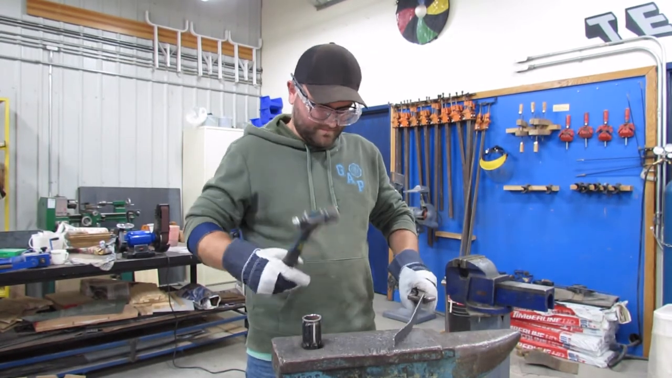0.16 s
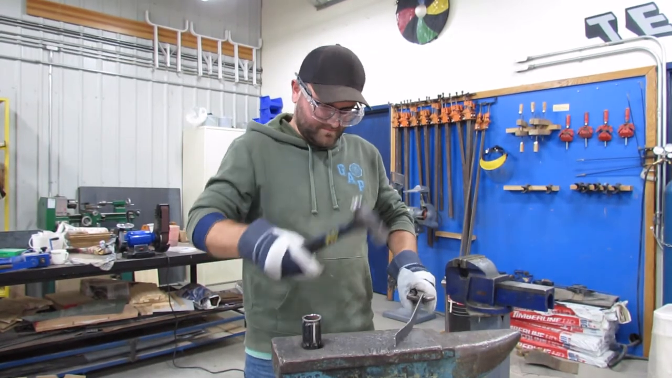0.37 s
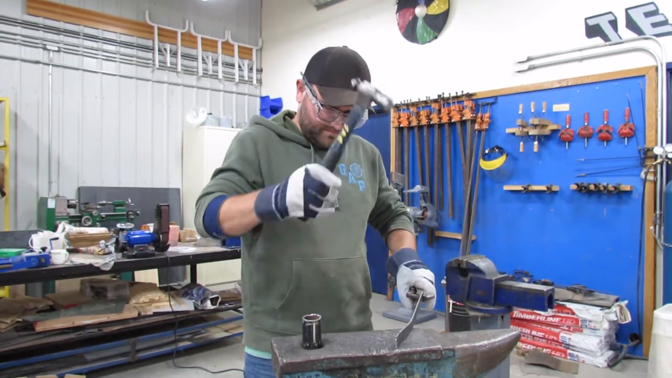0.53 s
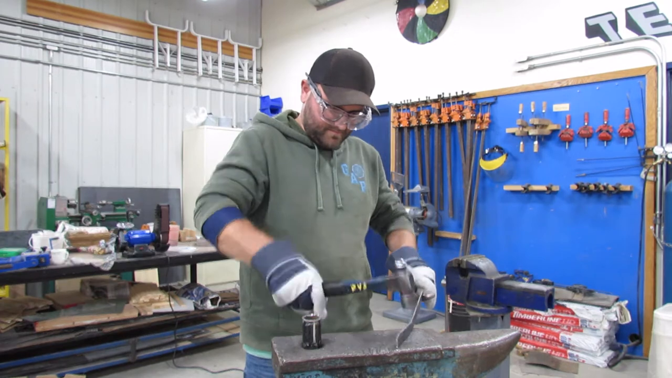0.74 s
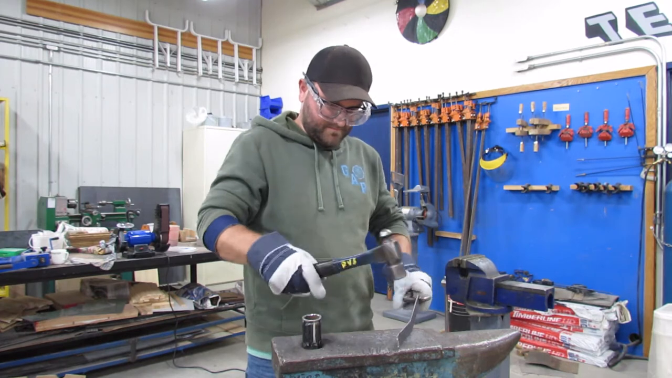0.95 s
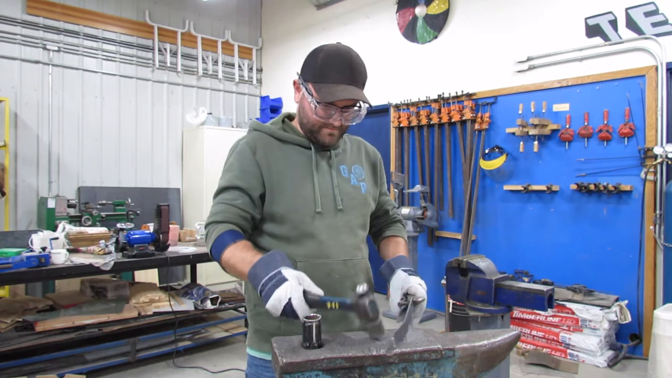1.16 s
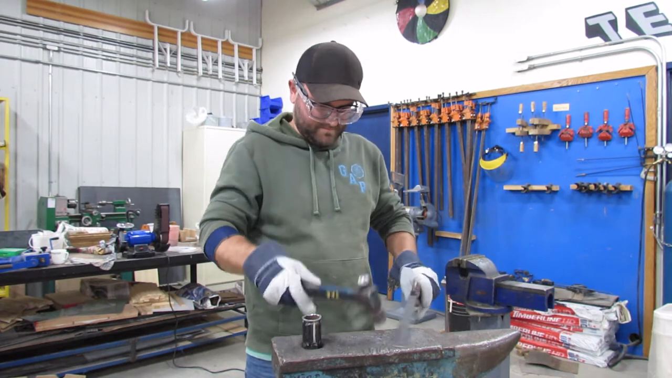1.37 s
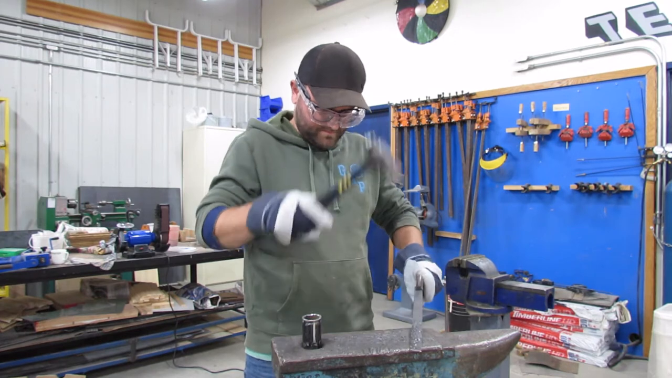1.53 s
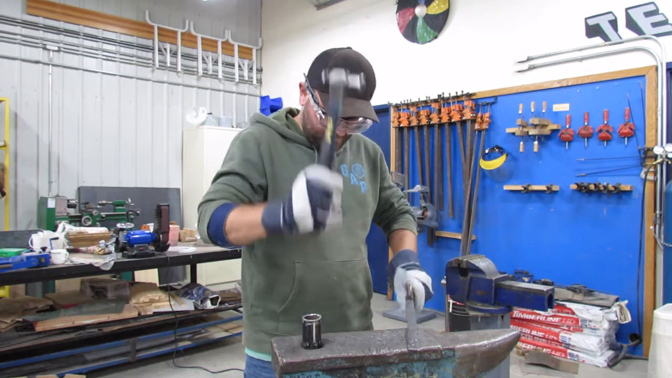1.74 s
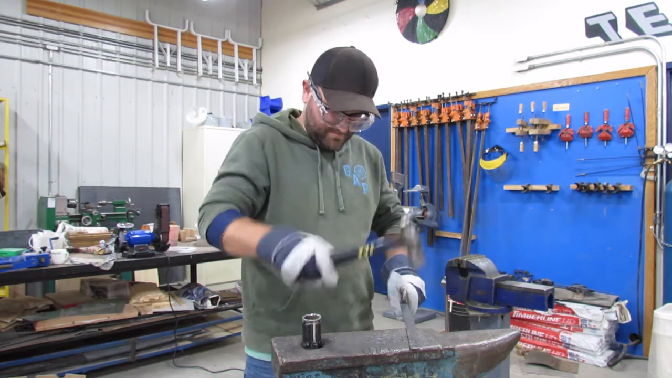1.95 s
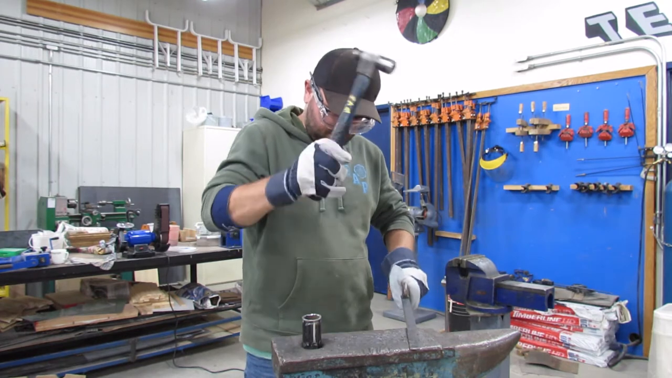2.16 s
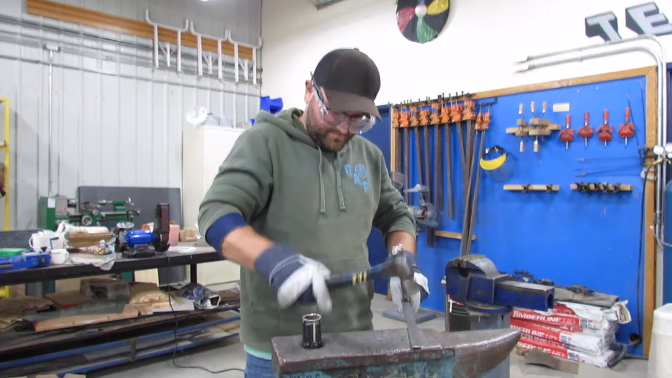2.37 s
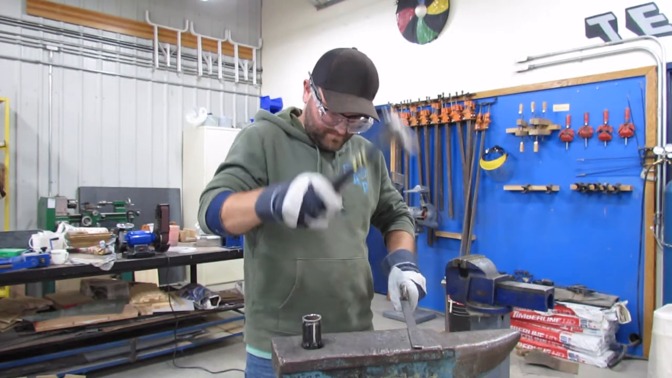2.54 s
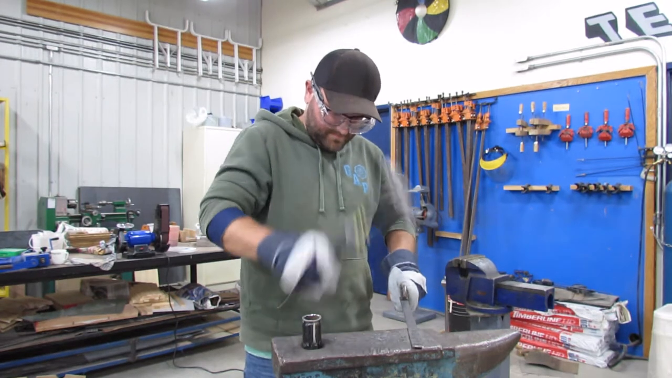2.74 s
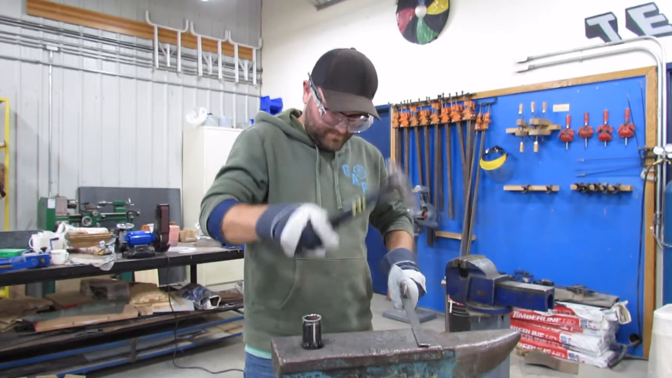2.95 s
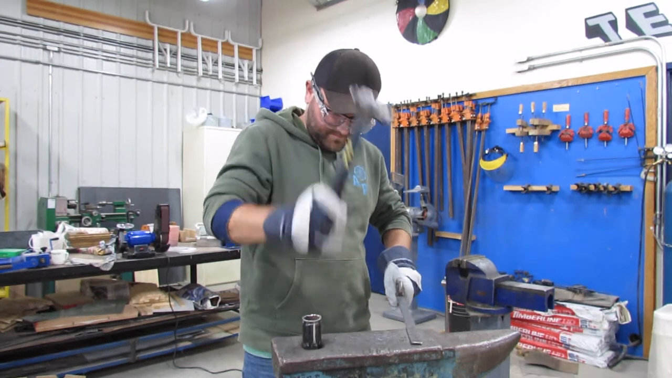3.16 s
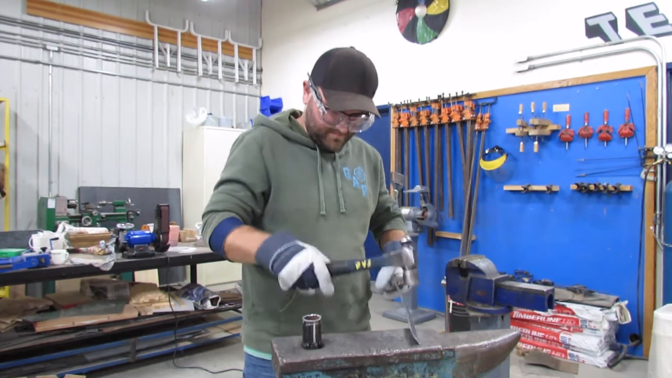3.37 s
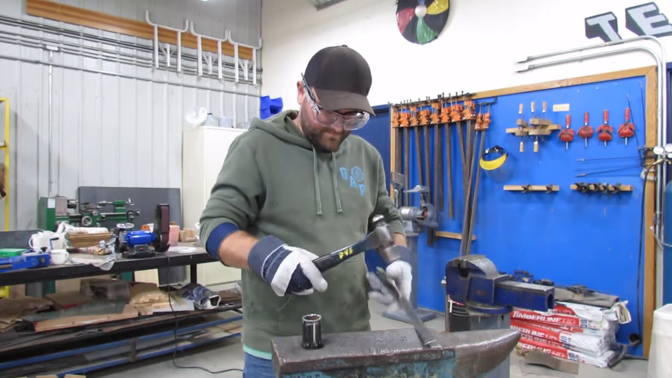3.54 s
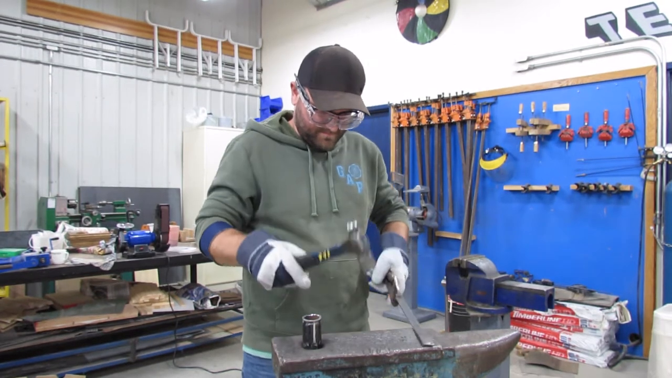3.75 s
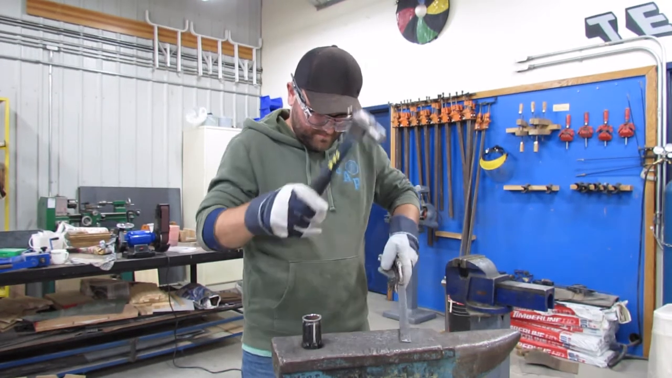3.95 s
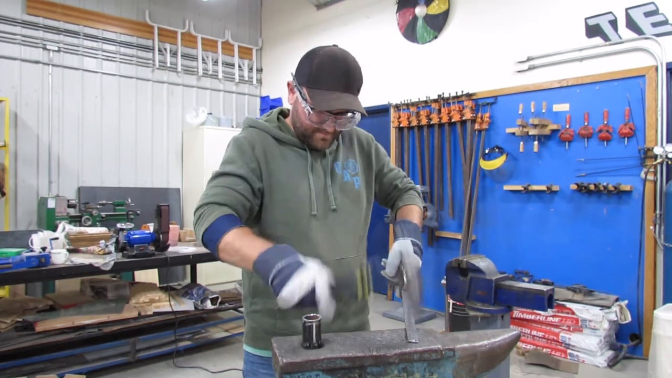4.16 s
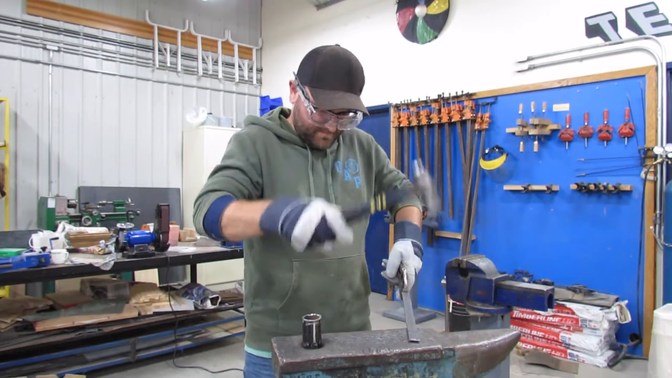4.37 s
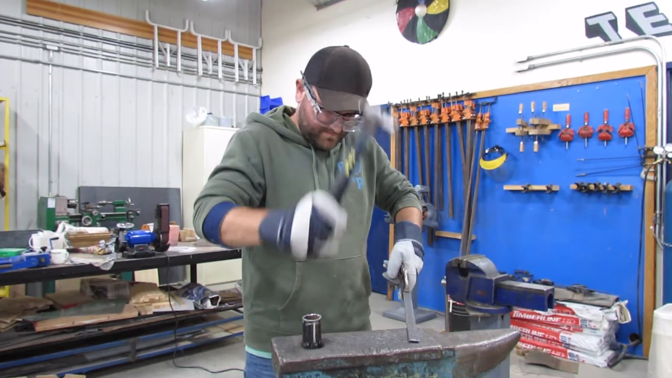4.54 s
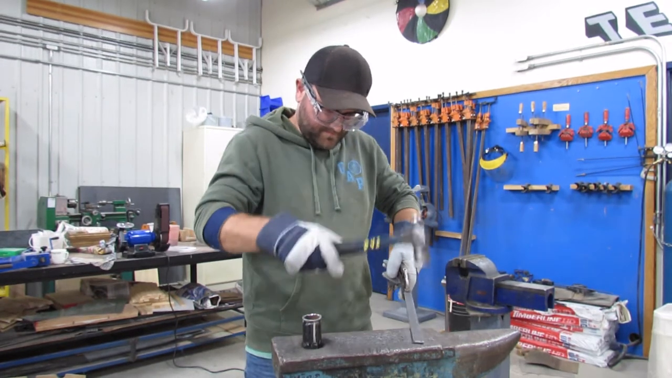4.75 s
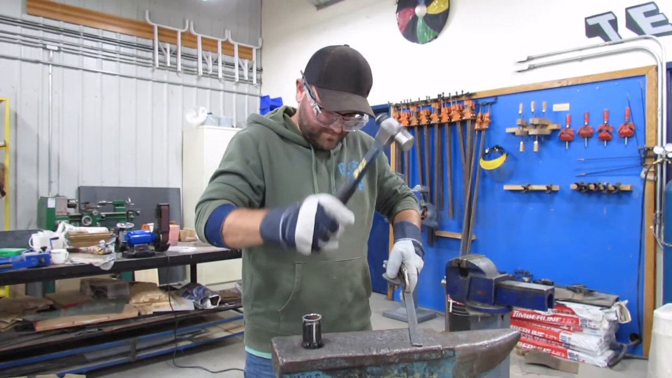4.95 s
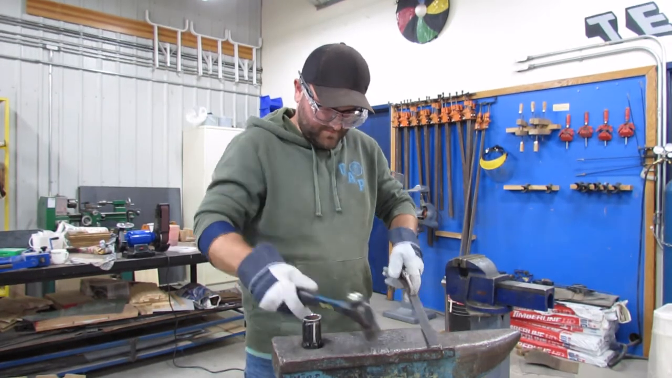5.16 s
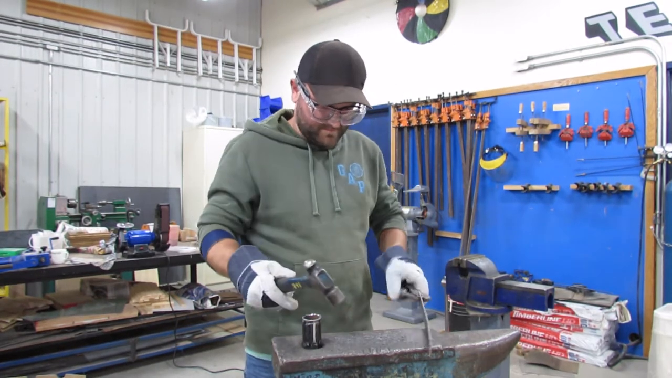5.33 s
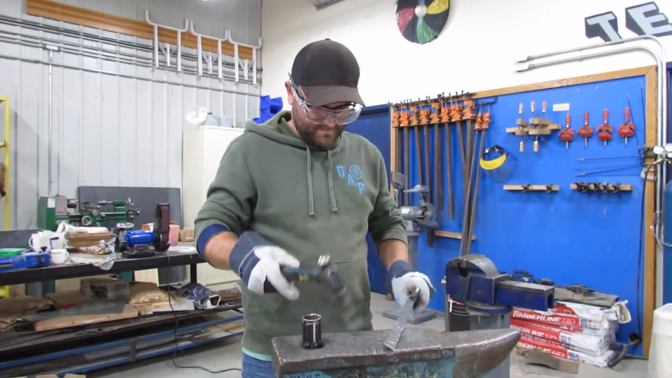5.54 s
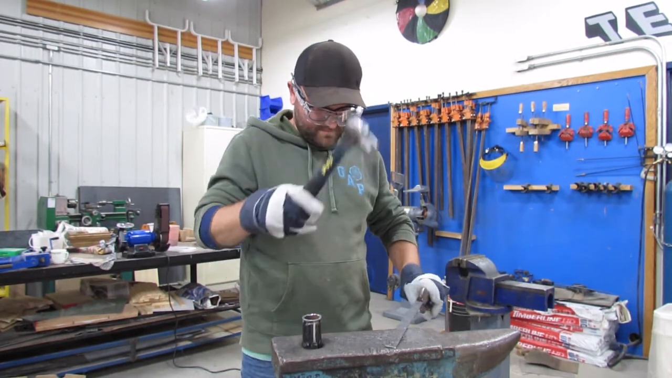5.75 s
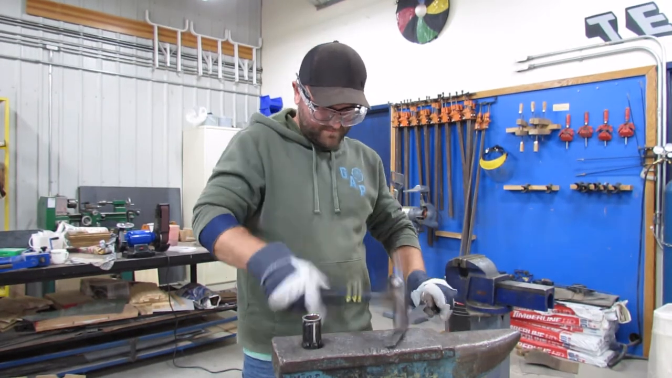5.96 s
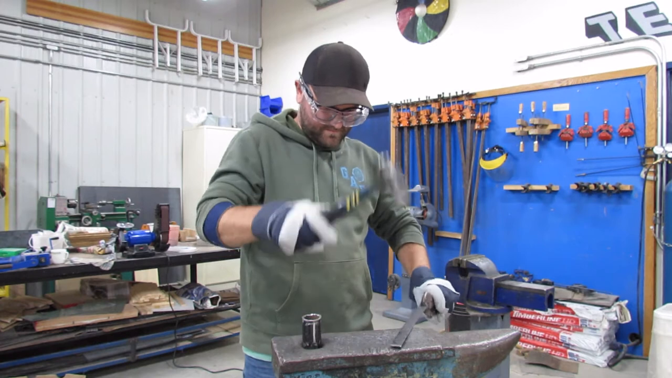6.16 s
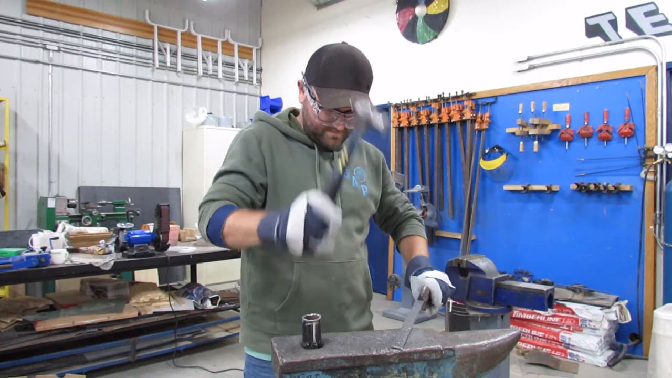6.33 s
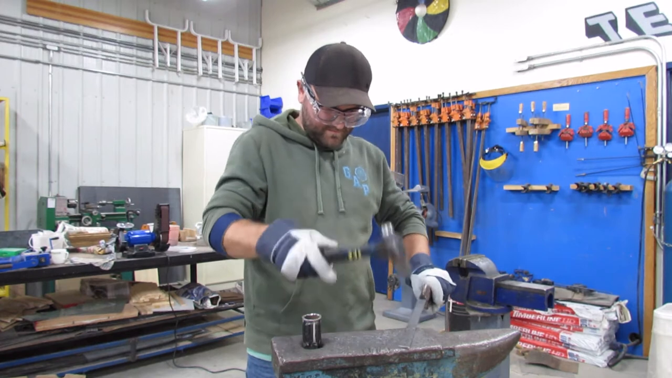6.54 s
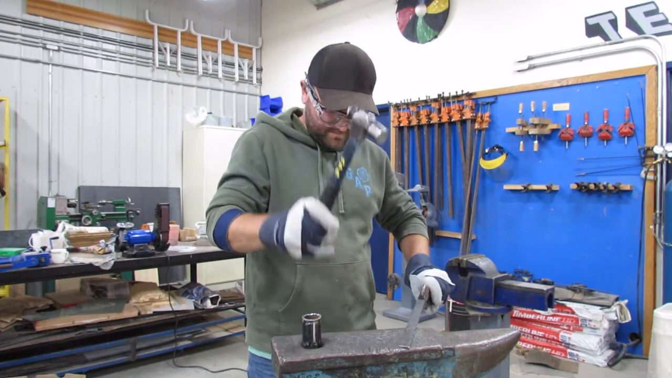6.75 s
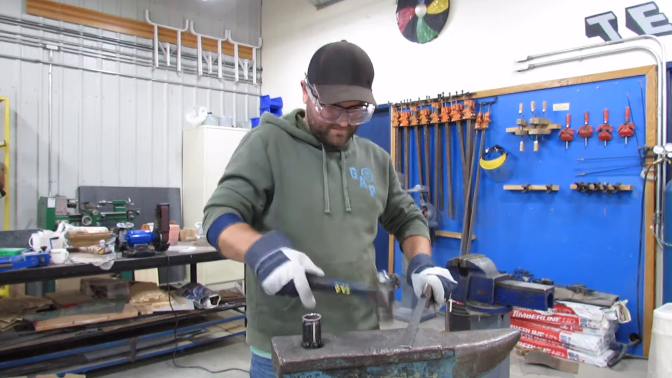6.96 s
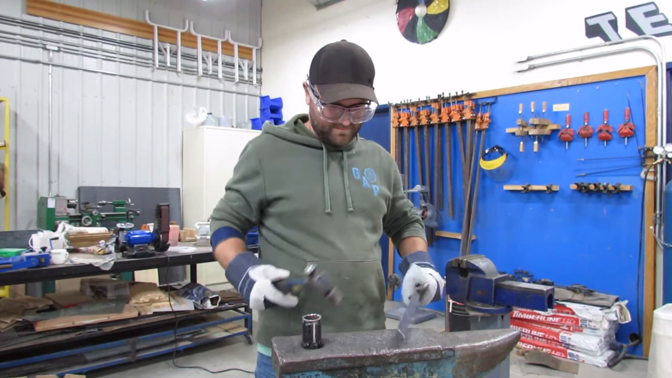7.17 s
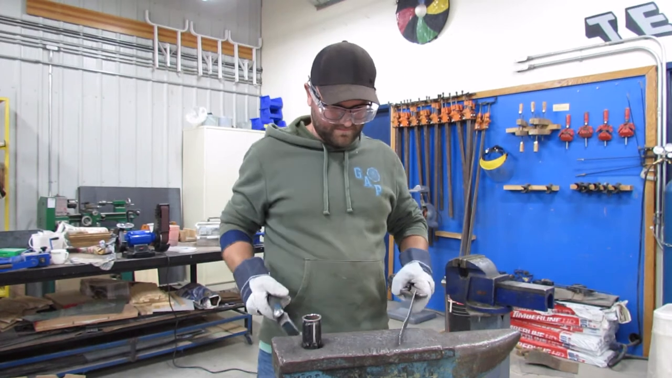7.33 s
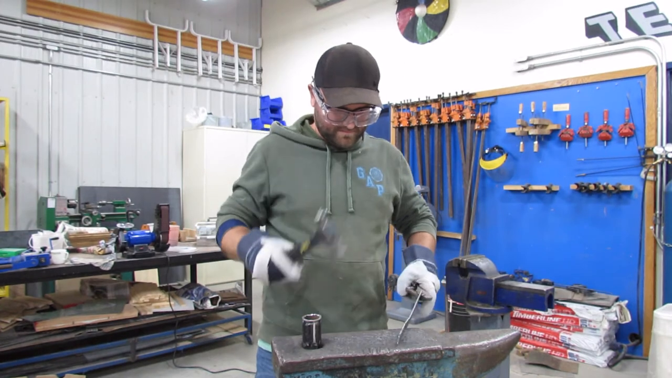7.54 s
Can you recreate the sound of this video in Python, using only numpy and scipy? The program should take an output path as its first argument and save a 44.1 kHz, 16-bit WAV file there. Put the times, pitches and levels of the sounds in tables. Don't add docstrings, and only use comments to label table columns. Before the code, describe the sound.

A ball peen hammer strikes a steel flat bar on an anvil in loud, sharp, short-ringing blows inside a large metal-walled workshop, with brief pauses.

```python
import sys
import numpy as np
from scipy import signal
from scipy.fft import rfft, irfft, next_fast_len
from scipy.io import wavfile
from scipy.ndimage import uniform_filter1d, map_coordinates

SR = 44100
rng = np.random.default_rng(int(sys.argv[2]) if len(sys.argv) > 2 else 0)


def voltage_ratio(decibels):
    exponent = np.asarray(decibels, float) / 20
    return 10 ** exponent


def materialize(psi):
    bounded = np.clip(np.atleast_2d(psi).T, -1, 1)
    quanta = np.round(bounded * 32767).astype(np.int16)
    wavfile.write(sys.argv[1], SR, quanta)


N = 339570

# (edge_db, chatter_t60_s)
HARD, LIGHT = (-3.5, 0.01), (-15, 0.026)
BLOW_TAIL_S, LIGHT_TAIL_S = 0.75, 0.4
TAP_CRACK_DB = -2.5
LOOSE_DAMPING = 0.65
MIDDLE_HZ = 5515


def hammer_blows():
    # start_s, peak_db, anvil_ring_db, bar_ring_db, brightness_db_per_octave
    blow_table = [(0.799, -4.5, 7.5, -14.5, 0), (1.9319, -.5, 5, -13.5, 3), (2.3981, 0.25, 5.5, -14, 4),
                  (2.851, 1.44, 3.9, -20, 2.7), (3.3169, 0.4, 5, -5.5, 2.1), (4.2516, -1.5, 4, -0.5, 3.5),
                  (4.696, 0.7, 4.5, -0.5, 2.85), (5.1419, -3, 9, -15, 2.5), (6.0367, -0.05, 5.5, -15.5, 4),
                  (6.4935, 1.2, 2.7, -8, 3), (6.922, -1.5, 7.5, -8, 1.5)]
    rows = [(*row, 6 - row[1], MIDDLE_HZ) for row in blow_table]
    return contacts(rows, HARD, BLOW_TAIL_S, crack_db=4.0, wet_db=-8.5, favour_db=1.5, damping=0.52)


def hammer_rests():
    # start_s, peak_db, anvil_ring_db, bar_ring_db, brightness_db_per_octave
    rest_table = [
        (1.248, -30, 0.45, -13, -8.5),
        (7.008, -22.5, 13.4, 7.5, -2),
    ]
    rows = [(*row, -9.5 - row[1], MIDDLE_HZ) for row in rest_table]
    return contacts(rows, HARD, LIGHT_TAIL_S, TAP_CRACK_DB, wet_db=-4.5, favour_db=5, damping=LOOSE_DAMPING)


def bar_taps():
    # start_s, peak_db, bar_ring_db, brightness_db_per_octave, favoured_mode_hz
    tap_table = [(1.277, -33.5, -0.2, -4, 4550), (1.337, -38, 10, -1.2, 4550),
                 (1.386, -26, -2.5, 5.5, 5000), (1.455, -35, 3, 3.7, 7990), (1.472, -36, 5, 2.6, 5515),
                 (3.615, -43, 7.5, -2, 5515), (3.652, -36, 1.1, 2, 7990), (3.668, -40, 4.5, 8.5, 7990),
                 (3.68, -35.5, -7, 2.5, 6660), (3.853, -39, 5, 3, 5000), (3.886, -45, 4, 1.5, 5515),
                 (3.925, -47.5, 0, 0.5, 6660), (3.983, -54, 5.5, -2, 5515), (4.06, -57.5, 7, 3.5, 5515),
                 (5.577, -45.5, 16, -4, 2720), (5.599, -42, 10, 0.5, 5000), (7.367, -27.5, -4, 0.6, 2720)]
    anvil_db, thud_db = -27, 1
    rows = [(s, db, anvil_db, bar_db, tilt_db, thud_db, hz) for s, db, bar_db, tilt_db, hz in tap_table]
    return contacts(rows, LIGHT, LIGHT_TAIL_S, TAP_CRACK_DB, wet_db=-3.5, favour_db=5, damping=LOOSE_DAMPING)


def contacts(rows, touch, tail_s, crack_db, wet_db, favour_db, damping):
    out = np.zeros((2, N))
    t = np.arange(SR // 4) / SR
    for s, db, anvil_db, bar_db, tilt_db, thud_db, favoured_hz in rows:
        steel = voltage_ratio(anvil_db - 17.5) * anvil_ring(tilt_db, t)
        steel += voltage_ratio(bar_db - 14) * bar_ring(tilt_db, t, favoured_hz, favour_db, damping)
        steel *= 1 - np.exp(-t / 0.00005)
        ringing = steel[0].copy()
        click = crack_pulse(tilt_db)
        steel += voltage_ratio(crack_db) * signal.fftconvolve(chatter(touch, t), click[None], axes=1)[:, :len(t)]
        thud = voltage_ratio(thud_db - 35.5) * stand(arrival_s=0.006, rise_s=0.0039)
        add(out, s, voltage_ratio(db) * steel)
        add(out, s, voltage_ratio(db) * thud * voltage_ratio([[1.5], [-1.5]]))
        ringing[:len(click)] += voltage_ratio(crack_db + 13.5) * click
        sent = ringing + 1.9 * thud[:len(t)]
        add(out, s, voltage_ratio(db + wet_db) * hall(sent, tail_s, early_db=5.5, early_t60_s=0.29))
    return out


def anvil_ring(tilt_db, t):
    anvil_hz = [1560, 1749, 1940, 2755, 3500, 3562, 3941, 4441, 5865, 6090, 6175, 7190, 7933, 9378, 9500,
                11700, 12380, 13870]
    # level_db, t60_s
    anvil_modes = [(-1.5, 0.063), (-2.5, 0.063), (-9.5, 0.091), (1, 0.049), (3.5, 0.034), (-11.5, 0.086),
                   (-14, 0.12), (-14, 0.062), (-16.5, 0.011), (-2, 0.02), (0.5, 0.041), (1, 0.01),
                   (3, 0.019), (3, 0.017), (-2.5, 0.026), (-19.5, 0.017), (-7.5, 0.0071), (-18.5, .05)]
    return ring(anvil_hz, anvil_modes, tilt_db, t, detune=0.00018)


def bar_ring(tilt_db, t, favoured_hz, favour_db, damping):
    bar_hz = [2720, 3490, 4550, 5000, 5515, 6660, 7990, 9350, 10890, 12700]
    # level_db, t60_s
    bar_modes = [(-12, 0.071), (-11.5, 0.44), (-7.5, 0.064), (-4.5, 0.017), (-3, 0.14), (-2, 0.18),
                 (-1, 0.085), (-7.5, 0.21), (-12, 0.085), (-13, 0.039)]
    octaves = np.log2(np.divide(bar_hz, favoured_hz))
    favour = favour_db * np.exp(-(octaves / 0.1) ** 2)
    held = [(level + more, t60 * damping) for (level, t60), more in zip(bar_modes, favour)]
    return ring(bar_hz, held, tilt_db, t, detune=0.0029)


def ring(mode_hz, modes, tilt_db, t, detune):
    hz = np.array(mode_hz)[:, None]
    db, t60 = np.transpose(modes)[:, :, None]
    draw = rng.standard_normal((4, len(modes), 1))
    scatter_db = 1.5
    size = voltage_ratio(db + scatter_db * draw[0] + tilt_db * np.log2(hz / 5000) - 60 * t / t60)
    phase = 2 * np.pi * hz * (1 + detune * draw[1]) * t + 3 * draw[2]
    lag = (0.25 + hz / 25000) * draw[3] / 2
    return np.array([(size * np.sin(phase + side * lag)).sum(0) for side in (1, -1)])


def crack_pulse(tilt_db):
    # freq_hz, density_db_per_hz
    crack_colour = [(180, -25.5), (500, -14.5), (1000, -10), (1600, -6), (3000, -7.5), (6000, -9.5),
                    (10000, -12), (13500, -20.5), (16500, -27)]
    hz = np.fft.rfftfreq(2048, 1 / SR)
    return causal(along(crack_colour, hz) + tilt_db * np.log2((hz + 300) / 5000))


def chatter(touch, t):
    edge_db, chatter_t60_s = touch
    noise = rng.standard_normal((2, len(t)))
    noise = noise[0] + 0.3 * noise
    rattle = noise * (voltage_ratio(-5.5 - 60 * t / chatter_t60_s) + voltage_ratio(-26.5 - 60 * t / 0.18))
    edge = np.diff(rng.standard_normal((2, len(t) + 1)))
    return rattle + voltage_ratio(edge_db - 60 * t / 0.0081) * edge


def stand(arrival_s, rise_s):
    # mode_hz, level_db, t60_s
    stand_modes = [(55.3, -25, 0.068), (100, -5.5, 0.25), (142, 3, 0.091), (206.3, -11.5, 0.35),
                   (258.3, -2.5, 0.076), (320, -23, 0.79)]
    t = np.arange(SR // 2) / SR
    swing = 0
    for hz, db, t60 in stand_modes:
        envelope = voltage_ratio(db + rng.normal(0, 0.23) - 60 * t / t60)
        swing = swing - envelope * np.cos(2 * np.pi * hz * (t - arrival_s))
    return swing * (1 - np.exp(-(t / rise_s) ** 2))


def drags():
    # firmest_s, level_db, swell_s, fade_s (times per 20 dB)
    drag_table = [
        (1.29, -55.5, 0.05, 0.1),
        (1.385, -36.5, .015, 0.023),
        (1.474, -33.5, .08, 0.055),
        (3.67, -32.5, 0.035, 0.038),
        (3.856, -50, 0.0098, 0.26),
        (3.98, -58, 0.11, 0.025),
        (5.55, -53.5, 0.042, .06),
        (5.605, -46, 0.089, .04),
    ]
    # mode_hz, width_hz, level_db
    sliding_modes = [(2616, 50, -11.5), (3456, 150, -14), (4340, 18, -5.5), (5660, 40, -7),
                     (4940, 270, -16.5), (6670, 170, -30.5), (7850, 120, -13), (9170, 14, -6.5),
                     (11800, 44, -10), (12700, 34, -24)]
    grit = rng.standard_normal(N) * voltage_ratio(3.5 * wobble(120)) * strokes(drag_table)
    hiss = filtered(grit, lambda hz: voltage_ratio(-25 * np.log2((hz + 1) / 6000) ** 2 / 2))
    dry = voltage_ratio(15.5) * filtered(grit, resonances(sliding_modes)) + voltage_ratio(-11) * hiss
    wet = hall(dry, BLOW_TAIL_S, early_db=3.5, early_t60_s=0.1)[:, :N]
    return dry * voltage_ratio([[0.3], [-0.3]]) + voltage_ratio(-13.0) * wet


def ports(x):
    # freq_hz, left_lead_rad
    port_lead = [(2200, 0), (3300, -.7), (4400, -.1), (6000, -.1), (7700, -.8), (10500, -1.6), (13000, -.7),
                 (15500, -.4)]
    return filtered(x, lambda hz: np.exp(1j * np.outer([0.5, -0.5], along(port_lead, hz))))


def hall(x, tail_s, early_db, early_t60_s):
    # freq_hz, t60_s
    hall_t60 = [(100, 0.86), (400, 0.33), (1000, 0.88), (3000, 1), (8000, 0.72), (15000, 0.33)]
    # freq_hz, correlation
    hall_alike = [(60, 0.71), (180, 0.91), (550, 0.46), (1650, 0.04), (4970, 0.2), (15000, -0.28)]
    hz, t, z = signal.stft(rng.standard_normal((2, round(tail_s * SR))), SR, nperseg=256)
    late = voltage_ratio(-60 * t / along(hall_t60, hz)[:, None])
    early = voltage_ratio(early_db - 60 * t / early_t60_s)
    tail = spread(signal.istft(z * (late + early), SR, nperseg=256)[1], hall_alike)
    delayed = np.pad(x, (130, 0))
    return signal.fftconvolve(delayed[None], tail / np.linalg.norm(tail[0]), axes=1)


def fan():
    # time_s, level_db
    air_level = [(0.0, -54), (3.6, -56), (3.71, -56), (5.25, -58), (5.77, -57.5), (6.67, -57.5),
                 (7.7, -57.5)]
    t = np.arange(N) / SR
    air = voltage_ratio(np.interp(t, *np.transpose(air_level)) - 3.05) * fan_air()
    lines = motor_whine(t) + voltage_ratio(0.5) * bearing_whistle(t)
    pan = voltage_ratio(3.5 * np.array([[0.5], [-0.5]]))
    return pan * (air + voltage_ratio(3.0) * lines)


def fan_air():
    # freq_hz, density_db_per_hz
    fan_colour = [(15, -25), (25, -4.5), (120, -6.5), (200, -7), (420, -14), (800, -15), (1100, -20.5),
                  (1600, -21), (3000, -29), (6300, -29.5), (8000, -36.5), (13600, -45.5), (16500, -70.5)]
    # freq_hz, correlation
    fan_alike = [(60, 0.27), (180, 0.99), (550, 0.64), (1650, 0.37), (4970, 0.14), (15000, 0.17)]
    z = signal.stft(rng.standard_normal((2, N)), nperseg=1024)[2]
    field = uniform_filter1d(rng.standard_normal(z.shape[1:]), 8, 0)
    patches_db = 1.8 * unit(uniform_filter1d(field, 6, 1))
    pair = signal.istft(z * voltage_ratio(patches_db), nperseg=1024)[1][:, :N]
    return unit(spread(filtered(pair, lambda hz: voltage_ratio(along(fan_colour, hz))), fan_alike))


def motor_whine(t):
    # line_hz, level_db
    whine_lines = [(118.4, -66.5), (172.3, -71.5), (349.9, -71.5), (427, -71), (586.8, -78), (2116, -80),
                   (4732, -92), (6158, -90.5), (13867, -103)]
    lines = 0
    for hz, level_db in whine_lines:
        size = voltage_ratio(level_db + 1.0 * wobble(21.0))
        lines = lines + size * np.sin(2 * np.pi * hz * t + 1.7 * wobble(15) + [[0], [0.7]])
    return lines


def bearing_whistle(t):
    # peak_s, level_db
    whistle_peaks = [(0.058, -72), (.2, -66), (0.592, -63.5), (1.65, -64.5), (5.919, -86.5), (6.02, -70),
                     (7.6, -69)]
    swell_s = 0.071
    size = voltage_ratio(-78) + strokes([(s, db, swell_s, swell_s) for s, db in whistle_peaks])
    return size * np.sin(2 * np.pi * 1373 * t + 2.5 * wobble(27.0))


def strokes(rows):
    t = np.arange(N) / SR
    return sum(voltage_ratio(db - 20 * np.maximum((s - t) / swell, (t - s) / fade)) for s, db, swell, fade in rows)


def unit(x):
    return x / np.sqrt(np.mean(x ** 2) + 1e-20)


def along(points, hz):
    f, v = np.transpose(points)
    return np.interp(np.log(hz + 1), np.log(f + 1), v)


def wobble(rate_hz):
    knots = rng.standard_normal(int(N * rate_hz / SR) + 4)
    return map_coordinates(knots, [np.arange(N) * rate_hz / SR])


def filtered(x, response):
    m = next_fast_len(x.shape[-1] + SR // 4)
    return irfft(rfft(x, m) * response(np.fft.rfftfreq(m, 1 / SR)), m)[..., :x.shape[-1]]


def resonances(peaks):
    def response(f):
        total = 0
        for k, (c, w, db) in enumerate(peaks):
            total = total + (-1) ** k * voltage_ratio(db) * 1j * f * w / (c * c - f * f + 1j * f * w)
        return total
    return response


def causal(gain_db):
    cepstrum = irfft(np.log(voltage_ratio(gain_db)))
    cepstrum[1:len(cepstrum) // 2] *= 2
    cepstrum[len(cepstrum) // 2 + 1:] = 0
    pulse = irfft(np.exp(rfft(cepstrum)))
    return pulse / np.linalg.norm(pulse)


def spread(pair, alike):
    def mid_side(hz):
        turn = np.arccos(np.clip(along(alike, hz), -1, 1)) / 2
        return np.array([np.cos(turn), np.sin(turn)])
    mid, side = filtered(pair, mid_side)
    return np.array([mid + side, mid - side])


def add(out, s, sound):
    part = out[:, round(s * SR):][:, :sound.shape[1]]
    part += sound[:, :part.shape[1]]


def scene():
    steel = hammer_blows() + hammer_rests() + bar_taps() + drags()
    return ports(steel) + fan()


def overload(dry):
    # start_s, left_size, right_size, recovery_hz
    jolt_table = [
        (1.934, 0.65, -1.2, 25.1),
        (2.3988, 0.33, -0.83, 25),
        (2.8509, -0.026, 0.58, 154),
        (3.319, -.02, -0.39, 130),
        (4.2545, -0.16, -0.11, 159.8),
        (4.6934, -0.15, 0.22, 151),
        (6.04, -0.27, 0.11, 154),
        (6.494, 0.16, 0.45, 170),
        (6.922, 0.17, 0.36, 151),
    ]
    shift = np.zeros_like(dry)
    t = np.arange(SR // 8) / SR
    rise_s = 0.00059
    push = t / rise_s * np.exp(1 - t / rise_s)
    for s, left, right, recovery_hz in jolt_table:
        jolt = filtered(push, lambda hz: (1j * hz / (1j * hz + recovery_hz)) ** 2)
        add(shift, s, np.outer([left, right], jolt))
    driven = dry + shift
    ceiling, knee = 0.74, 3
    return driven / (1 + np.abs(driven / ceiling) ** knee) ** (1 / knee)


def microphone(x):
    # freq_hz, gain_db
    mic_gain = [(12000, -0.21), (14500, 1), (15300, -12.5), (17000, -29)]
    return filtered(x, lambda hz: voltage_ratio(along(mic_gain, hz) + np.outer([-1, 1], 1.1 * (hz / 13000) ** 2)))


def low_pass(x):
    return signal.sosfilt(signal.butter(12, 16770, fs=SR, output="sos"), x)


def record(dry):
    mix = microphone(overload(dry))
    return low_pass(mix)


dry = scene()
out = record(dry)
materialize(out)
```